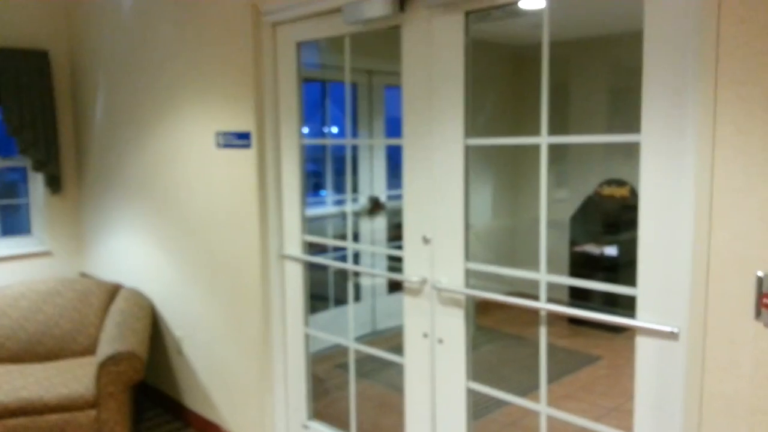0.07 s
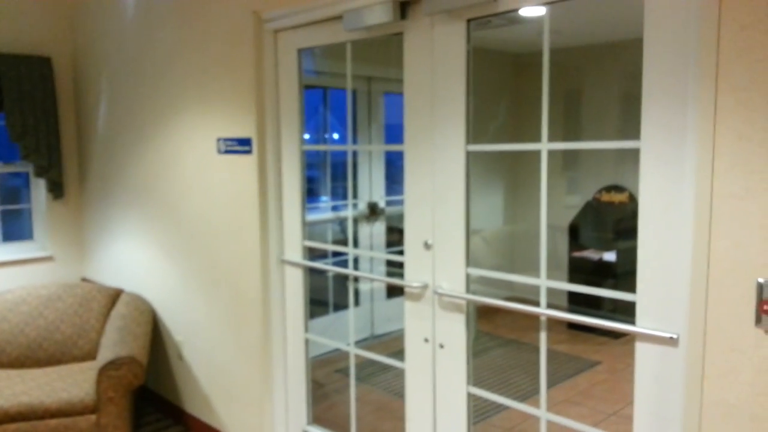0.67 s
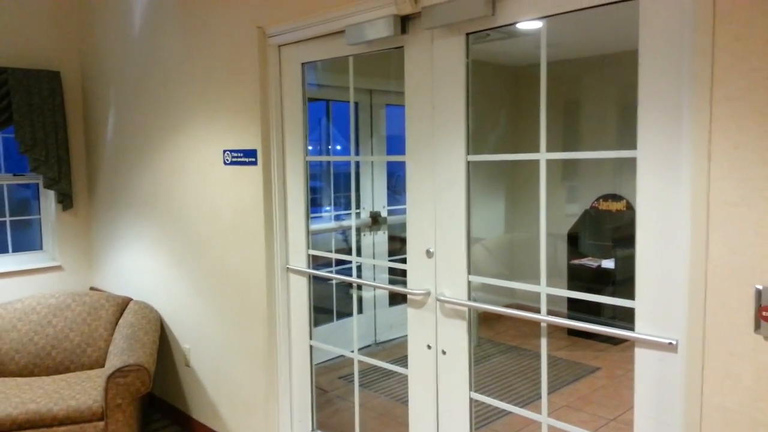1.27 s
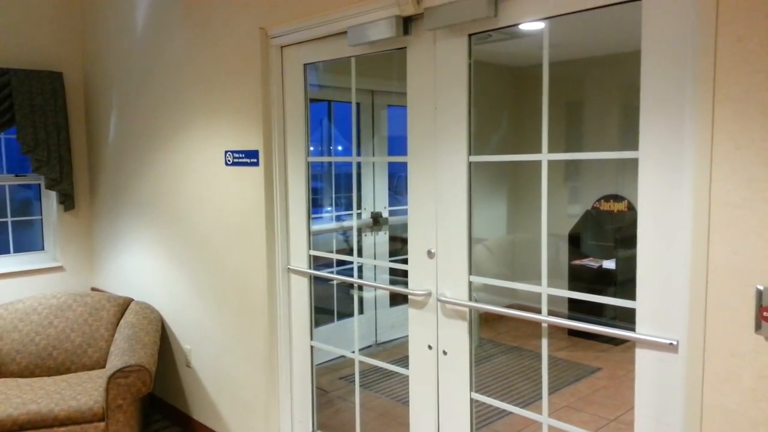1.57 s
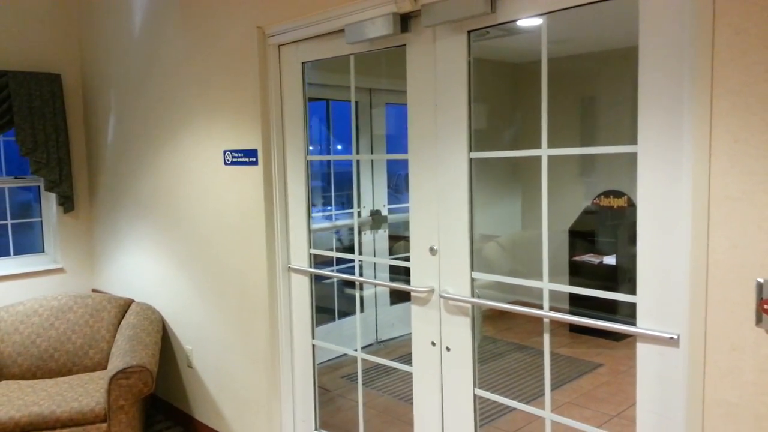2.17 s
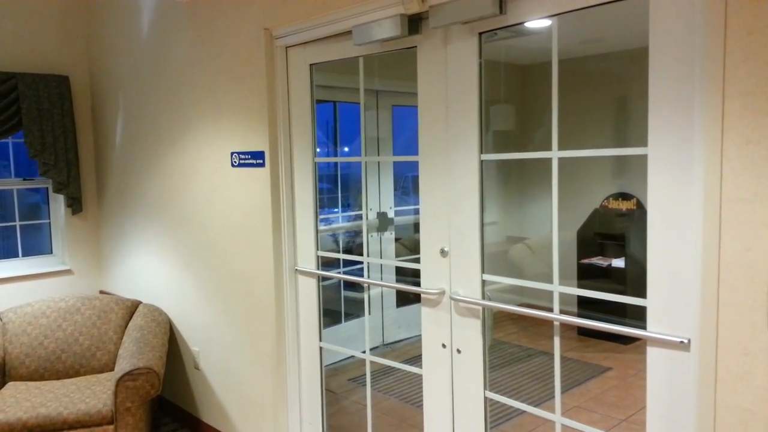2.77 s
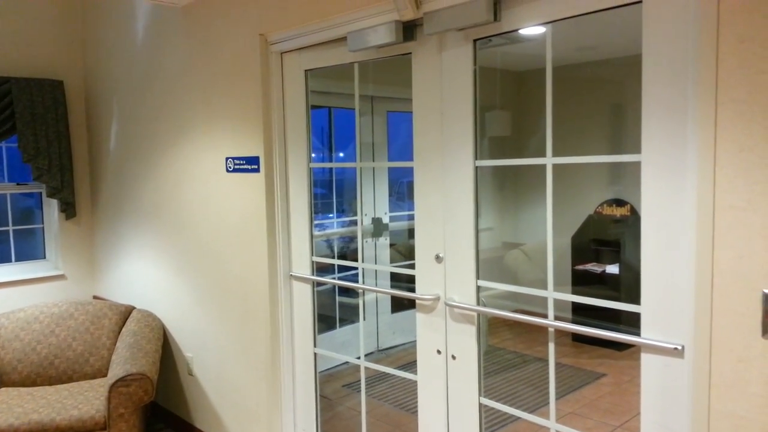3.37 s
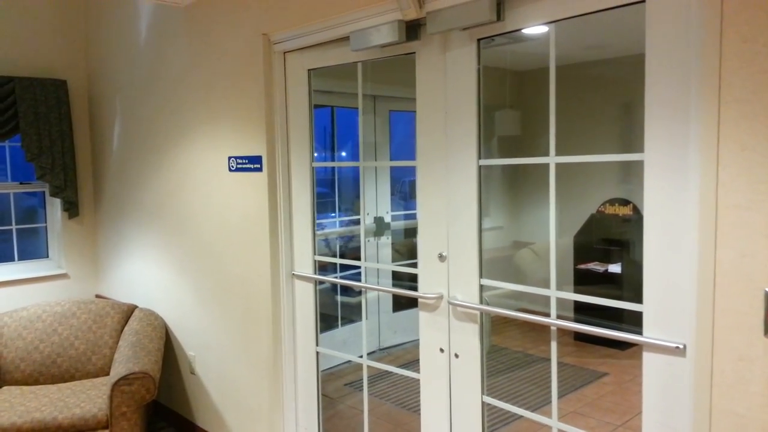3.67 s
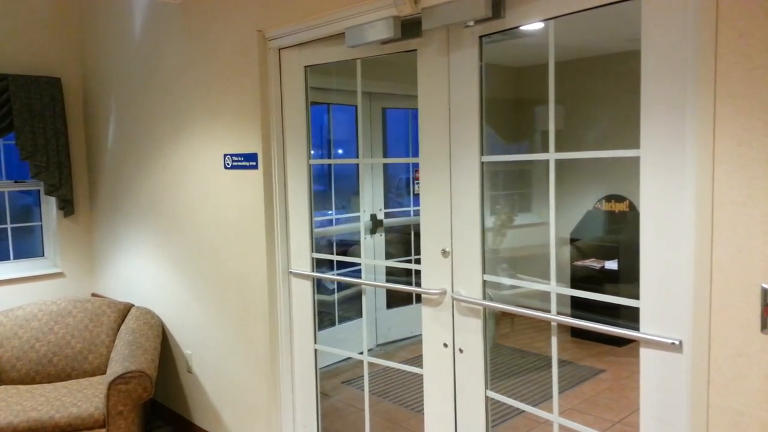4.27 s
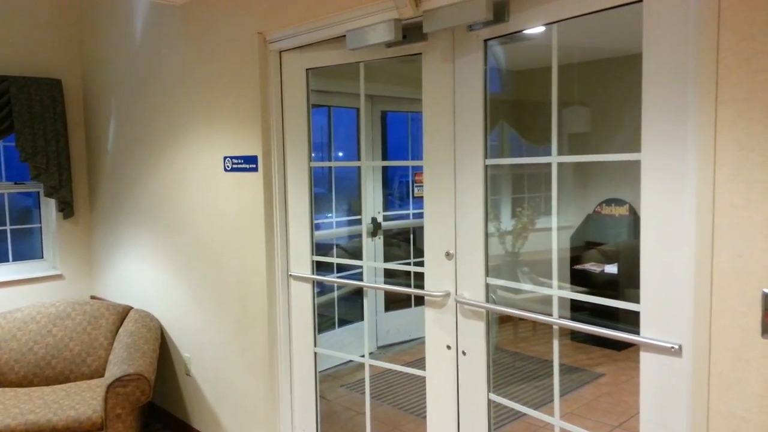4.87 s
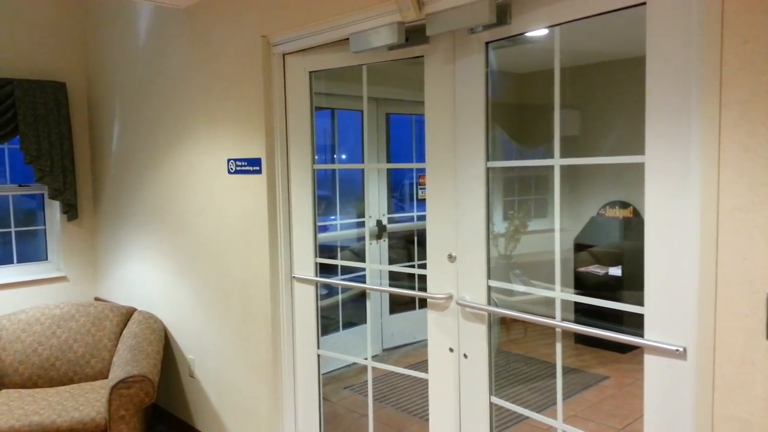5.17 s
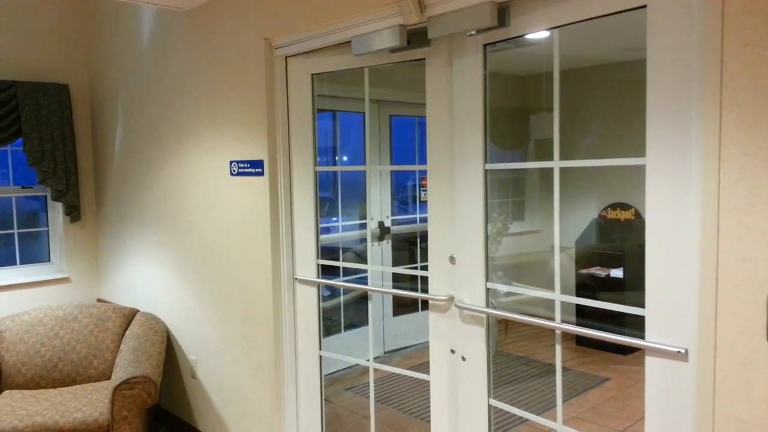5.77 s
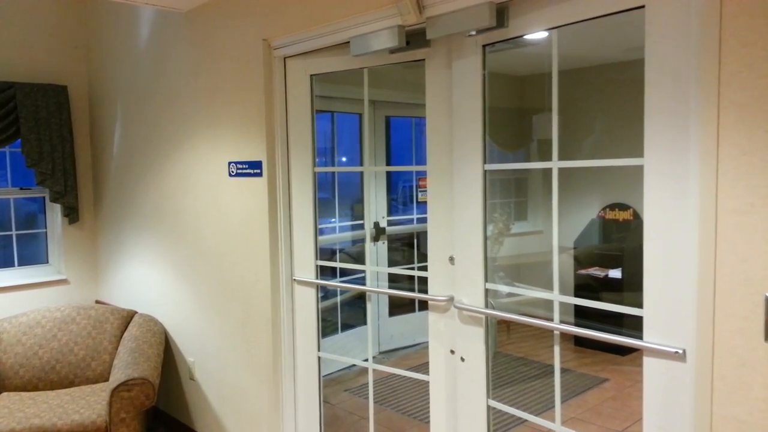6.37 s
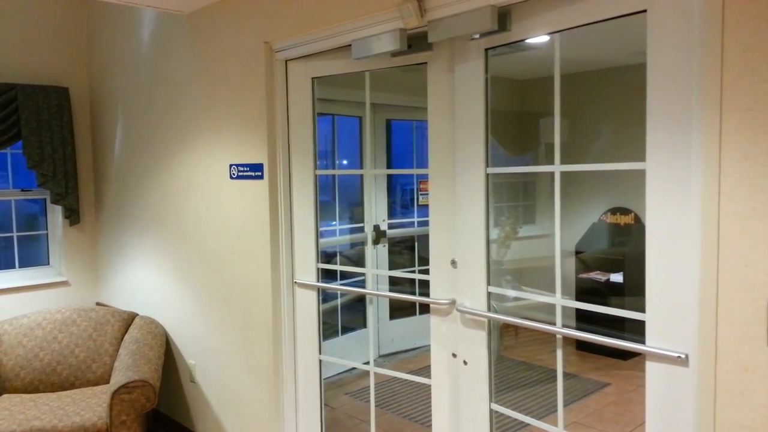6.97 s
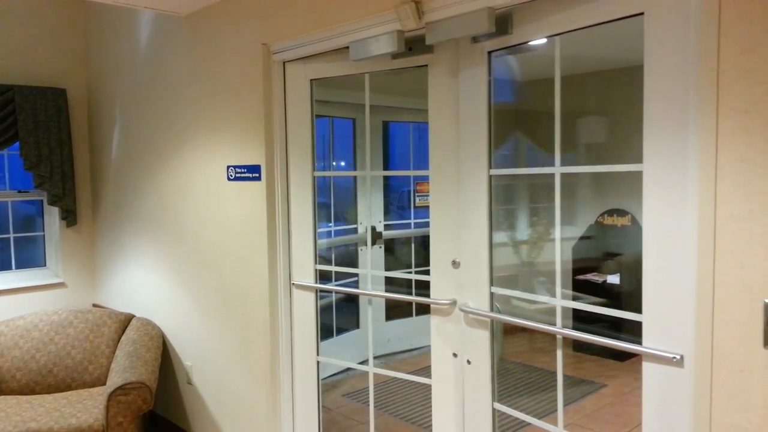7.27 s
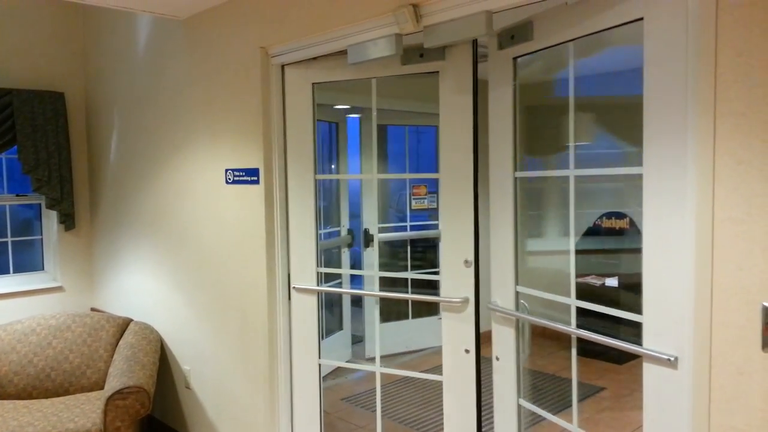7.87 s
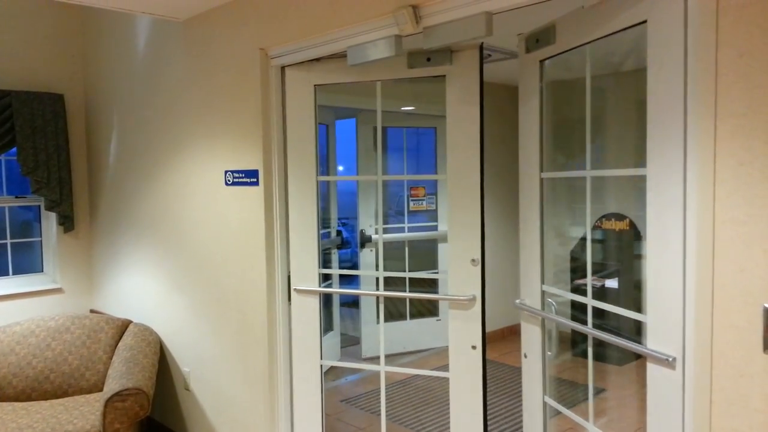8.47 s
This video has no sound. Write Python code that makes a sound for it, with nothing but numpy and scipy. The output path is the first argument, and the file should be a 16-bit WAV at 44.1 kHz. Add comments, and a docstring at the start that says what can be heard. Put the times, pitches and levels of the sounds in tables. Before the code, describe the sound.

A high, fluttering wind whistle shifts between notes at glass doors, while a draught rumbles and hisses through an echoing lobby.

```python
"""Strong wind presses on the double glass doors of a lobby. After a short silence, the draught rumbles
in the vestibule and hisses past the door edges while a motor hums. At 1.5 seconds the doors knock and
the slit between them starts to whistle, jumping between notes as the pressure changes; the hard room
makes it flutter. The whistle dies away just before 5 seconds, then returns. From about 7 seconds air
swishes through the outer door, a door swings open, and the rush of air grows louder and brighter."""
import sys
import numpy as np
from scipy import signal
from scipy.fft import rfft, irfft
from scipy.io import wavfile
from scipy.ndimage import uniform_filter1d

SR = 44100
rng = np.random.default_rng(int(sys.argv[2]) if len(sys.argv) > 2 else 0)


def transcribe(signal):
    """Save signal, clipped to [-1, 1], as a 16-bit WAV file at the path in sys.argv[1]."""
    frames = np.atleast_2d(signal).T
    limited = np.clip(frames, -1, 1)
    pcm = np.round(limited * 32767).astype(np.int16)
    wavfile.write(sys.argv[1], SR, pcm)


N = 384552
TIME, FREQ = np.arange(N) / SR, np.arange(N // 2 + 1) * SR / N
DOOR_OPENS_S, USUAL_JET_HZ = 7.37, 2700
LOW_HZ, MIDDLE_HZ, HIGH_HZ = 3560, 3653, 4013  # the slit's notes at the usual wind speed

# The tone colours of four noises. Each row: frequency in Hz, relative strength in dB.
BACKGROUND_COLOUR = [(2000, -13), (5000, 16), (7000, 10.5), (10000, 4.5), (13000, 6.5), (14500, -1.5)]
RUMBLE_COLOUR = [(20, -44), (40, -43), (60, -25), (80, -14), (100, -15.5), (120, -4), (190, -3.5),
                 (235, 1.5), (275, -1.5), (340, -1), (420, -6), (520, -8), (750, -17.5), (1400, -54)]
RUSH_COLOUR = [(250, -28), (480, 0.5), (600, 0), (780, 0.5), (1000, -4), (1300, -8), (1700, -11),
               (2400, -14.5), (3500, -17), (6000, -32)]
LEAK_COLOUR = [(700, -20), (1300, -1), (2000, 2.5), (3000, -1.5), (4000, -2), (5000, -2), (6000, -11),
               (7500, -14.5), (9500, -26.5), (14500, -64)]
# How wide the air sounds. Each row: frequency in Hz, left-right difference against the shared part in dB.
STEREO_WIDTH = [(60, -5), (150, -14.5), (300, -10.5), (600, -6.5), (1200, 1), (2500, -0.5), (8000, 0)]
# The notes of a motor and its fan. Each row: pitch in Hz, level in dB.
MOTOR_NOTES = [(120, -58), (172, -53.5), (232.5, -53), (240, -49), (264, -53.5), (366.3, -52), (401.7, -49),
               (459, -53.5), (746, -58), (803.5, -60.5)]
# The vestibule's deep drone. Each row: time in seconds, relative level in dB.
DRONE_LEVELS = [(0.8, -58), (1.3, -81), (1.63, -56), (2.51, -62), (2.81, -54), (3.07, -63), (6.92, -65.5),
                (8.19, -73), (8.65, -64)]
# Gusts in the vestibule. Each row: time in seconds, relative level of the rumble in dB.
GUST_LEVELS = [(0.8, -38.5), (1.3, -37), (1.65, -37), (2.2, -37), (3.2, -37.5), (3.55, -35.5), (4.3, -36),
               (5.05, -39.5), (5.9, -37), (6.3, -37.5), (7, -35), (7.3, -38), (7.6, -34), (8.05, -37.5),
               (8.7, -35.5)]
# Where the vestibule and door frames ring. Each row: pitch in Hz, width in Hz, boost in dB.
VESTIBULE_RESONANCES = [(241.7, 12.6, 4.5), (306, 14.5, 5), (391.3, 18, 5), (533, 4.4, 1), (1084, 5.4, 7.5),
                        (1182, 4.1, 7.5), (1480, 7, 9), (1607, 5.3, 7.5)]
# Where the widening door gap rings. Each row: pitch in Hz, width in Hz, boost in dB.
GAP_RESONANCES = [(1847, 100, 10), (2940, 170, 7)]
# Door knocks. Each row: start in seconds, level in dB, pitch in Hz, width in Hz, fade time in seconds.
DOOR_KNOCKS = [(0.905, -53, 10900, 1800, 0.002), (1.535, -38, 680, 500, 0.018),
               (1.549, -38, 1180, 420, 0.018), (4.457, -50, 4700, 1300, 0.012),
               (4.463, -48.5, 5600, 4000, 0.005)]
# Hoots from wider cracks. Each row: peak time in seconds, length in seconds, pitch in Hz, level in dB.
CRACK_HOOTS = [(4.11, .2, 1245, -53.5), (5.2, 0.8, 1088, -52.5), (0.84, 0.16, 2445, -52.5),
               (1.25, .25, 2440, -61), (2.66, .3, 3250, -60), (2.79, .16, 4110, -57)]
# The outer door's swish. One row: peak time and length in seconds, pitch and width in Hz, level in dB.
DOOR_SWISH = (7, 0.5, 1830, 420, -52)
# The jet of air in the slit; faster is higher. Each row: time in seconds, pitch in Hz.
JET_PITCHES = [(0.8, 2444), (1.3, 2410), (1.52, 2556), (1.85, 2690), (2.12, 2736), (2.58, 2970),
               (3.12, 2675), (3.82, 2824), (4.02, 2750), (4.3, 2677), (4.37, 2567), (4.85, 2427),
               (5.17, 2590), (5.95, 2492), (6.42, 2790), (6.62, 2979), (6.95, 3043), (7.1, 3016),
               (7.22, 2889), (7.45, 2826), (7.62, 2934), (7.7, 3022), (7.8, 3110), (7.92, 3073),
               (8.26, 3080), (8.42, 2943), (8.72, 2982)]
# The notes the jet locks onto. Each row: start in seconds, end in seconds, pitch in Hz at usual speed.
EDGE_TONES = [(1.502, 1.928, LOW_HZ), (1.93, 4.335, MIDDLE_HZ), (4.191, 4.608, LOW_HZ),
              (5.086, 5.831, LOW_HZ), (6.004, 6.263, LOW_HZ), (6.248, 6.581, MIDDLE_HZ),
              (6.6, 7.274, HIGH_HZ), (7.233, 7.58, MIDDLE_HZ), (7.613, 8.8, HIGH_HZ)]
# The whistle surges and sinks. Each row: time in seconds, level in dB.
WHISTLE_LEVELS = [(1.45, -65), (1.55, -41), (1.7, -41.5), (1.76, -35), (1.83, -43), (1.89, -38.5),
                  (2.01, -36.5), (2.08, -40), (2.28, -40), (2.36, -42), (2.68, -39.5), (2.76, -43),
                  (2.84, -38.5), (3.0, -42), (3.1, -38), (3.26, -36), (3.32, -41.5), (3.5, -40.5),
                  (3.59, -37.5), (3.72, -46), (3.91, -39.5), (4.3, -39), (4.45, -46), (4.57, -46),
                  (4.72, -62), (5.02, -73), (5.09, -44), (5.23, -38.5), (5.29, -42.5), (5.46, -40),
                  (5.58, -48.5), (5.71, -38.5), (5.79, -42), (5.94, -54), (6.05, -42.5), (6.21, -36.5),
                  (6.31, -41), (6.5, -39.5), (6.61, -42), (6.72, -37), (6.79, -29), (6.85, -34),
                  (7.22, -33.5), (7.34, -42.5), (7.44, -37), (7.5, -42), (7.61, -42), (7.71, -33.5),
                  (7.88, -38), (7.98, -32), (8.11, -30.5), (8.16, -38), (8.22, -37.5), (8.31, -27),
                  (8.39, -34.5), (8.5, -36), (8.58, -33.5), (8.64, -36), (8.71, -31)]
# The highest notes beam to the right. Each row: frequency in Hz, dB added left and taken from the right.
WHISTLE_BEAM = [(3400, 0.5), (3850, 1.0), (4200, -3.0)]


def undb(db):
    """Turn decibels into a gain to multiply by."""
    return 10 ** (np.asarray(db) / 20)


def unit(x):
    """Scale a signal to an average power of one."""
    return x / np.sqrt(np.mean(x ** 2))


def curve(rows):
    """Join (seconds, value) points with straight lines."""
    return np.interp(TIME, *np.transpose(rows))


def colour(points):
    """Turn (Hz, dB) points into a gain for every frequency."""
    hz, db = np.transpose(points)
    return undb(np.interp(np.log(FREQ + 1), np.log(hz), db))


def resonance(hz, width_hz):
    """A gain of one at the ringing pitch, falling away on both sides."""
    return 1 / np.sqrt(1 + ((FREQ ** 2 - hz ** 2) / ((FREQ + 1) * width_hz)) ** 2)


def ringing(rows):
    """Gains that boost each resonance in a table and leave the rest alone."""
    extra_power = sum((undb(db) ** 2 - 1) * resonance(hz, width) ** 2 for hz, width, db in rows)
    return np.sqrt(1 + extra_power)


def wander(rate):
    """Smooth random drift of size about one, with `rate` new values a second."""
    targets = rng.standard_normal(int(N / SR * 200))
    path = np.interp(TIME * rate, np.arange(len(targets)), targets)
    return unit(uniform_filter1d(path, int(SR / rate / 2) + 1))


def swell(peak_s, length_s):
    """A smooth rise and fall around one moment."""
    return np.exp(-(2 * (TIME - peak_s) / length_s) ** 2)


def pan(db):
    """Gains that make the left side `db` louder than the right."""
    return undb(np.array([[db], [-db]]) / 2)


def tone(hz):
    """A pure note that follows a pitch, with a power of one."""
    return np.sqrt(2) * np.sin(2 * np.pi * np.cumsum(hz * np.ones(N)) / SR)


def steady(x, samples=3400):
    """Even out slow changes in loudness but keep the quick flutter."""
    power = uniform_filter1d(np.mean(x ** 2, axis=0), samples)
    slow_power = uniform_filter1d(power, samples // 2)
    return x / np.sqrt(np.abs(slow_power) + 1e-7)


def air(gains):
    """Noise of swirling air: the bass is alike on both sides, the treble is not."""
    shared, difference = rng.standard_normal((2, len(FREQ))) + 1j * rng.standard_normal((2, len(FREQ)))
    difference *= colour(STEREO_WIDTH)
    left_right = irfft(gains * np.array([shared + difference, shared - difference]), N)
    return left_right / np.std(left_right.mean(axis=0))


def lobby(x, echo_share=0.84, fade_s=0.68):
    """Hard walls add a dense tail of echoes, different on each side."""
    tail = rng.standard_normal((2, SR)) * undb(-60 * TIME[:SR] / fade_s)
    tail /= np.sqrt(np.sum(tail ** 2, axis=1, keepdims=True))
    echoes = signal.fftconvolve(tail, x[None], axes=1)[:, :N]
    return np.sqrt(1 - echo_share) * x + np.sqrt(echo_share) * echoes


def seconds_open():
    """Time since the door began to open; zero before that."""
    return np.maximum(TIME - DOOR_OPENS_S, 0)


def background(hiss_db=-64, whine_db=-80, whine_hz=10202):
    """A faint, even hiss with a thin electrical whine."""
    hiss = air(colour(BACKGROUND_COLOUR)) * undb(hiss_db)
    return (hiss + tone(whine_hz) * undb(whine_db)) * pan(7.0)


def motor(drift_hz=0.406, waver_db=1.5):
    """A motor and its fan hum on; each note wavers a little."""
    notes = (tone(hz + drift_hz * wander(2.998)) * undb(db + waver_db * wander(4))
             for hz, db in MOTOR_NOTES)
    return sum(notes) * pan(1.3)


def drone(hz=57.8, drift_hz=2, trim_db=-1, waver_db=1.9):
    """The vestibule holds a deep, wavering note."""
    note = tone(hz + drift_hz * wander(4.6))
    level_db = curve(DRONE_LEVELS) + trim_db + waver_db * wander(6)
    return note * undb(level_db) * pan(0.6)


def draught(speed, gust_trim_db=-1, rush_db=-43, buffet_db=0.46, swirl_db=0.9):
    """Gusts rumble in the vestibule and make it ring; faster air rushes louder."""
    vestibule = ringing(VESTIBULE_RESONANCES)
    rumble = air(colour(RUMBLE_COLOUR) * vestibule)
    rumble *= undb(curve(GUST_LEVELS) + gust_trim_db + buffet_db * wander(10))
    rush = air(colour(RUSH_COLOUR) * vestibule)
    rush *= speed ** 0.33 * undb(rush_db + swirl_db * wander(9))
    return rumble * pan(1.35) + rush * pan(0.086)


def knocks(room_db=-5):
    """The doors knock and tick softly as they shift in their frame."""
    taps = np.zeros(N)
    for start, db, hz, width_hz, fade_s in DOOR_KNOCKS:
        ring = unit(irfft(rfft(rng.standard_normal(N)) * resonance(hz, width_hz) ** 2, N))
        fade = (TIME > start) * np.exp(-np.abs(TIME - start) / fade_s)
        taps += undb(db) * ring * fade
    return taps + undb(room_db) * lobby(taps)


def hoots(waver=0.00436):
    """Wind blows short, soft notes in the wider cracks."""
    notes = (undb(db) * swell(peak_s, length_s) * tone(hz * (1 + waver * wander(60)))
             for peak_s, length_s, hz, db in CRACK_HOOTS)
    return lobby(sum(notes))


def leak(speed, hiss_db=-53.7, opening_db_per_s=5.5, flicker_db=0.6):
    """Air hisses past the door edges, louder as it speeds up and as the gap widens."""
    level_db = hiss_db + opening_db_per_s * seconds_open() + flicker_db * wander(12)
    return air(colour(LEAK_COLOUR)) * speed ** 1.4 * undb(level_db) * pan(0.043)


def outer_door():
    """Air gives a short, hollow swish as the outer door parts."""
    peak_s, length_s, hz, width_hz, db = DOOR_SWISH
    return air(resonance(hz, width_hz) ** 2) * swell(peak_s, length_s) * undb(db)


def doorway(pour_db=-51, hiss_db=-58):
    """Air pours through the opening door, ringing the gap and hissing at its edge."""
    pour = air(resonance(hz=2000, width_hz=2300) ** 2 * ringing(GAP_RESONANCES)) * undb(pour_db)
    hiss = air(resonance(hz=6200, width_hz=3800) ** 2) * undb(hiss_db)
    return (pour + hiss) * seconds_open() ** 0.61  # grows past the levels above after one second


def free_jet(speed, level_db=-58.5, flicker_db=0.5):
    """Part of the jet never locks onto a note: it glides softly below the whistle."""
    # the pitch frays into hiss as the air speeds up and the door opens
    scatter = 0.009 * speed ** 4 + 0.025 * seconds_open()
    note = tone(USUAL_JET_HZ * speed * (1 + scatter * wander(170)))
    return lobby(note * speed ** 4 * undb(level_db + flicker_db * wander(13)))


def whistle(speed, pull=0.7, fade_in_s=0.05, fade_out_s=0.07, right_lag_s=0.000315):
    """The jet hits the slit's edge and locks onto one note after another; faster air pulls them up."""
    eddies = 1 + 0.002 * wander(14) + 0.0026 * wander(90)  # small swirls shake the pitch
    bend_hz = pull * USUAL_JET_HZ * (speed - 1)
    surge = undb(curve(WHISTLE_LEVELS))
    notes = np.zeros(N)
    for start, end, hz in EDGE_TONES:
        ramp = np.minimum((TIME - start) / fade_in_s, (end - TIME) / fade_out_s)
        locked = np.clip(ramp + 0.5, 0, 1)
        notes += surge * locked * tone((hz + bend_hz) * eddies)
    # the gliding pitch beats against its own echoes, which makes it flutter
    fluttering = lobby(unit(notes), echo_share=0.75)
    beam = colour(WHISTLE_BEAM)
    delay = np.exp(-2j * np.pi * FREQ * right_lag_s)
    left_right = irfft(rfft(fluttering) * np.array([beam, delay / beam]), N)
    return steady(left_right) * surge


def scene():
    """Add up the lobby's sounds; one wind speed steers the whistle, the jet, the hiss and the rush."""
    speed = curve(JET_PITCHES) / USUAL_JET_HZ  # one is the usual speed
    slit = whistle(speed) + free_jet(speed) + leak(speed)
    wind = draught(speed) + outer_door() + doorway() + drone()
    return slit + wind + motor() + hoots() + knocks() + background()


def record(dry, start_s=0.782, top_hz=14650):
    """Begin with a short silence and cut off the highest treble."""
    treble_cut = signal.ellip(10, 0.2, 80, top_hz, fs=SR, output="sos")
    return signal.sosfilt(treble_cut, dry * (TIME >= start_s))


dry = scene()
out = record(dry)
transcribe(out)
```